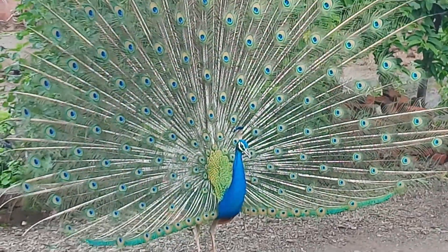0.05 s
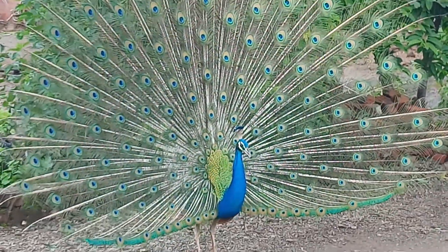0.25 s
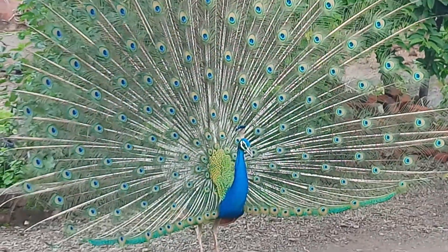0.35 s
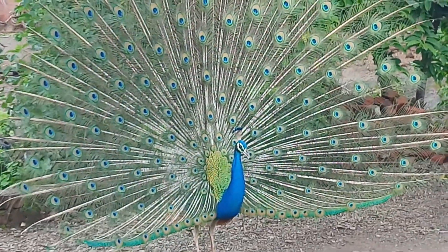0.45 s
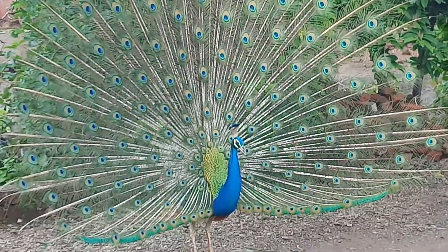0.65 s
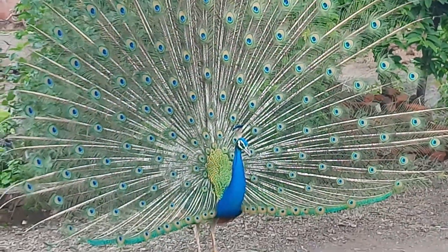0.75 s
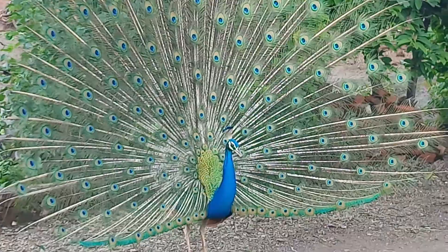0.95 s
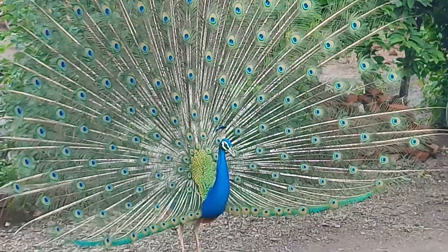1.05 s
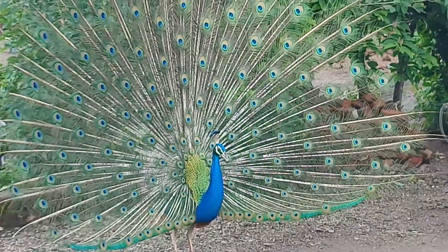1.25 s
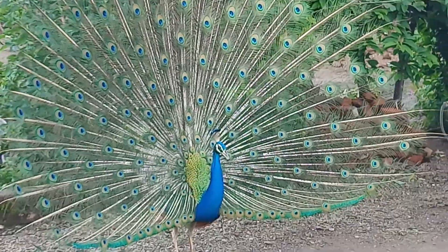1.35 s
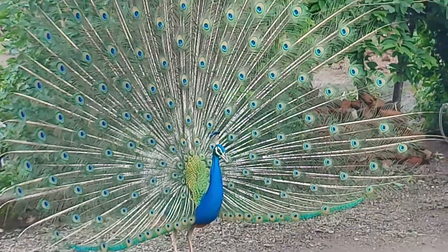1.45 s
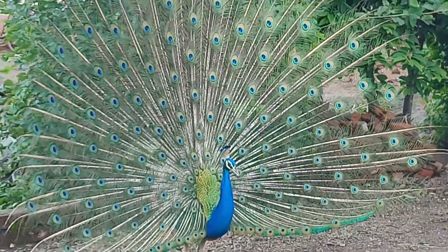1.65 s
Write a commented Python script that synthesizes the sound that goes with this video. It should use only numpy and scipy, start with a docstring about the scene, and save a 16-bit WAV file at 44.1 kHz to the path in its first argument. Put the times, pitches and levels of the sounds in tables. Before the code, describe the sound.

Small birds chatter and chirp outdoors over a faint low rumble and hiss.

```python
"""Small birds chatter in a garden: harsh syllables, a warble and two clear falling chirps.
Syllables are harmonics on a pitch arch, shaped by the throat and roughened by random modulation.
Warble notes and chirps are near-pure gliding tones with a little hiss. Walls and trees scatter the calls.
Behind them: thin far notes, faint feather rustles, soft bumps, foliage hiss and a low outdoor rumble."""
import sys
import numpy as np
from scipy import signal
from scipy.fft import rfft, irfft
from scipy.io import wavfile
from scipy.ndimage import uniform_filter1d

SR = 44100
rng = np.random.default_rng(int(sys.argv[2]) if len(sys.argv) > 2 else 0)


def persist_wave(psi):
    """Save psi, clipped to +-1, as 16-bit WAV."""
    counts = np.round(np.clip(psi, -1, 1) * 32767).astype(np.int16)
    wavfile.write(sys.argv[1], SR, np.atleast_2d(counts).T)


N = 74970

# background spectra: f/Hz, relative level/dB
RUMBLE_SPECTRUM = [(15, -42.5), (25, -16), (96, 4.5), (158, -0.5), (300, -14), (813, -20), (1200, -43)]
AIR_SPECTRUM = [(1000, -12.5), (1600, -5), (2400, 0.5), (3500, -2), (5000, -1.5), (6500, -10.5),
                (8500, -19.5), (9300, -18), (15500, -14)]
# soft bumps: t/s, f/Hz, level/dB, decay/s
SOFT_BUMPS = [(0.149, 231, -58, 0.012), (0.707, 180, -49, 0.011), (0.752, 169.7, -42, 0.0084)]
# rustles: t/s, half length/s, centre f/Hz, width/Hz, level/dB
RUSTLE_SWELLS = [(0.066, 0.038, 1750, 330, -57), (0.487, 0.089, 2530, 950, -51),
                 (0.783, 0.013, 3900, 1570, -54), (1.099, 0.043, 4260, 900, -50.5),
                 (1.201, 0.02, 3270, 1870, -43.5), (1.348, 0.043, 3070, 1580, -44.5)]
# distant birds: t/s, f/Hz, half length/s, level/dB
DISTANT_NOTES = [(0.132, 5950, 0.011, -58.5), (0.393, 970, 0.014, -63.5), (0.674, 584, 0.031, -67.5),
                 (0.78, 4660, 0.0043, -53)]
# overtone weighting of clear calls: f/Hz, gain/dB
OVERTONE_CURVE = [(4400, -52.5), (6100, -23), (7100, -21.5), (7700, -37), (8600, -19), (10500, -28.5),
                  (14000, -26)]
# single notes, then the warble run: t/s, f/Hz, half length/s, relative glide/(1/s), level/dB
CLEAR_NOTES = [(0.204, 2280, 0.003, -2.5, -43.5), (0.244, 2300, 0.0056, -8.5, -40),
               (0.265, 2280, .0055, -3, -37.5), (0.3295, 2290, 0.0026, -2.5, -33),
               (0.584, 2690, 0.0086, -6.5, -39), (0.672, 2666, .008, -8.5, -39),
               (0.87, 2320, 0.013, 0.5, -42), (0.885, 2680, 0.0089, -1.5, -43.5),
               (0.899, 2230, 0.0062, 2.5, -36), (0.901, 2380, 0.007, 12.5, -39.5),
               (.918, 3020, 0.0025, -7, -31.5), (0.923, 4200, 0.0061, -2.5, -45),
               (.931, 2900, 0.0026, -22.5, -33), (0.935, 2410, 0.0036, -4.5, -29),
               (.946, 2580, 0.0047, 6.5, -29), (0.954, 3050, 0.0024, 2, -32.5),
               (.961, 2450, 0.0047, -29, -31.5), (0.9672, 2750, 0.0026, 20, -33.5),
               (.976, 2860, 0.0076, -3.5, -35.5), (0.985, 2320, 0.0076, -4, -28),
               (1.079, 1950, 0.0049, 12, -49.5)]
# falling chirps: t/s, f/Hz, level/dB
NEAR_CHIRP_TRACK = [(1.09, 3100, -23.5), (1.09, 3602, -35), (1.1, 3525, -41), (1.103, 3754, -55),
                    (1.105, 5160, -39.5), (1.112, 4696, -38), (1.119, 3590, -30), (1.138, 3568, -30),
                    (1.141, 3033, -31), (1.146, 2643, -22.5), (1.15, 2520, -38.5), (1.159, 2337, -26.5),
                    (1.175, 2129, -42), (1.225, 2037, -50.5)]
FAR_CHIRP_TRACK = [(1.299, 3594, -52), (1.316, 3556, -45.5), (1.341, 3569, -43), (1.349, 3574, -44),
                   (1.358, 2950, -72), (1.362, 2554, -37), (1.386, 2160, -47.5)]
# syllables and longer squawks:
# apex t/s, apex f/Hz, rise/s, fall/s, level/dB, tilt/(dB/octave), roughness/(0-1)
HARSH_ARCHES = [(0.208, 2270, 0.02, 0.036, -45.5, -6, 0.5), (.267, 2383, 0.026, 0.029, -48, -5, 0.69),
                (.330, 2311, 0.005, 0.014, -45.5, -16.5, 0.63), (0.472, 2277, 0.0036, 0.02, -44, 7.5, 0.65),
                (.498, 2155, 0.015, 0.013, -41.5, 6, 0.46), (.564, 2107, 0.012, 0.021, -43, 1, 0.55),
                (.586, 2292, 0.0064, 0.024, -44, 4, 0.46), (0.663, 2430, 0.024, 0.035, -46.5, 0, 0.33),
                (.681, 2315, 0.008, 0.021, -42.5, 1.5, 0.38), (.835, 2682, 0.033, 0.076, -49.5, 3, 0.58),
                (.868, 2398, 0.021, 0.023, -45, -11, 0.62), (0.898, 2110, 0.011, 0.015, -41.5, -7, 0.57),
                (0.961, 1938, 0.006, 0.0032, -43, -14, 0.12), (1.428, 2122, 0.021, 0.016, -48.5, 1.5, 0.8),
                (1.448, 2252, 0.017, 0.029, -47.5, 1, 0.48), (1.481, 2244, 0.02, 0.017, -48, 10.5, 0.15),
                (1.542, 2078, 0.0079, 0.012, -49.5, 4, 0.67), (1.561, 2226, 0.013, 0.024, -47.5, 1, 0.53),
                (1.594, 2238, 0.016, 0.022, -49.5, 13, 0.44)]
SQUAWK_ARCHES = [(.207, 2301, 0.011, 0.04, -44, -0.5, 0.45), (.267, 2307, 0.016, 0.047, -42.5, -0.34, 0.54),
                 (.332, 2290, 0.028, 0.032, -46, -1, 0.5)]
# their throat responses: f/Hz, gain/dB
HARSH_RESPONSE = [(700, -71.5), (1100, -5.5), (1550, 4), (2000, -1), (2400, 20), (3100, 12), (4300, 4.5),
                  (5200, 1), (7000, -11), (8500, -56)]
SQUAWK_RESPONSE = [(800, -45.5), (1500, -1.5), (2300, 1.5), (3200, 4.5), (3800, -20.5), (6300, -9.5),
                   (8700, -27)]

RUMBLE_DB, AIR_DB = -62.5, -58.5
BUMP_ATTACK_S, FAR_GLIDE_PER_S = .004, -.3
LEAF_DECAY_S, WALL_DELAY_S, WALL_SPREAD_S, TAIL_T60_S = .009, .024, .0053, 1
SHIMMER_HZ, SHIMMER_WIDTH_HZ, SHIMMER_DB, SHIMMER_DECAY_S = 12850, 400, -41, .03
OVERTONE_STEP_DB, NOTE_JITTER, THROB_DB_PER_JITTER = -13, .011, 70
ARCH_DROP, ARCH_UP_S, ARCH_DOWN_S, EDGE_S = .52, .016, .018, .008
RASP_HZ, RASP_DEPTH, RASP_FADE_S, BREATH_GAIN = 554, .1474, .056, .843
SHELF_HZ, SHELF_DB, CUTOFF_HZ = 8980, -11, 15700


def undb(db):
    """Decibels to gain."""
    return 10 ** (np.asarray(db) / 20)


def unit(x):
    """Scale to rms 1."""
    return x / np.sqrt(np.mean(x ** 2) + 1e-20)


def gain_at(hz, curve):
    """Gain of an (f/Hz, level/dB) curve, interpolated in log f."""
    f, db = np.array(curve, float).T
    return undb(np.interp(np.log(hz + 1), np.log(f), db))


def noise(shape):
    """Unit-rms noise with amplitude spectrum shape(f)."""
    f = np.arange(N // 2 + 1) * SR / N
    return unit(irfft(rfft(rng.standard_normal(N)) * shape(f), N))


def flutter(hz):
    """Unit-rms random motion, low-passed at hz."""
    return noise(lambda f: 1 / (1 + (f / hz) ** 4))


def background():
    """Low rumble; wavering hiss of distant foliage and birds."""
    rumble = noise(lambda f: gain_at(f, RUMBLE_SPECTRUM) / (1 + (f / 1500) ** 4))
    air = noise(lambda f: gain_at(f, AIR_SPECTRUM)) * undb(1.4 * flutter(2.3))
    return undb(RUMBLE_DB) * rumble + undb(AIR_DB) * air


def bumps(t):
    """Dull knocks: a sine plus low noise, quickly damped."""
    out = np.zeros(N)
    for at_s, hz, db, decay_s in SOFT_BUMPS:
        dt = np.maximum(t - at_s, 0)
        env = 2 * (1 - np.exp(-dt / BUMP_ATTACK_S)) * np.exp(-dt / decay_s)
        out += undb(db) * env * (np.sin(2 * np.pi * hz * dt) + .4 * flutter(220))
    return out


def rustles(t):
    """Feathers and leaves: short, grainy swells of band noise."""
    out = np.zeros(N)
    for at_s, half_s, hz, width_hz, db in RUSTLE_SWELLS:
        band = noise(lambda f: np.exp(-(np.log((f + 1) / hz) * hz / width_hz) ** 2))
        out += undb(db) * np.exp(-((t - at_s) / half_s) ** 2) * band
    grain_db = 1.8 * flutter(100)
    return out * undb(grain_db)


def far_notes(t):
    """Distant birds: faint, slightly sinking sines."""
    out, shake = np.zeros(N), flutter(140)
    for at_s, hz, half_s, db in DISTANT_NOTES:
        pitch_hz = hz * (1 + FAR_GLIDE_PER_S * (t - at_s) + .0094 * shake)
        env = np.exp(-((t - at_s) / half_s) ** 2)
        out += undb(db) * env * np.sqrt(2) * np.sin(2 * np.pi * np.cumsum(pitch_hz) / SR)
    return out


def garden(calls, t, echo_db):
    """Direct sound plus leaf scatter, a smeared wall echo and a thin tail."""
    leaves = np.exp(-t / LEAF_DECAY_S)
    wall = np.exp(-((t - WALL_DELAY_S) / WALL_SPREAD_S) ** 2)
    tail = np.exp(-np.log(1000) * t / TAIL_T60_S)
    paths = [(leaves, -11.5), (wall, -15.5 + echo_db), (tail, -12 + echo_db / 2)]
    response = sum(undb(db) * unit(env * rng.standard_normal(N)) / np.sqrt(N) for env, db in paths)
    return calls + signal.fftconvolve(calls, response)[:N]


def shimmer(calls):
    """Narrow high hiss that swells with the calls and fades after them."""
    pole = np.exp(-1 / (SHIMMER_DECAY_S * SR))
    power = signal.lfilter([1 - pole], [1, -pole], calls ** 2)
    band = noise(lambda f: np.exp(-((f - SHIMMER_HZ) / SHIMMER_WIDTH_HZ) ** 2))
    return undb(SHIMMER_DB) * np.sqrt(power) * band


def beak_hiss():
    """High hiss of a clear call."""
    return undb(-24) * noise(lambda f: 1 / (1 + ((f - 6400) / 2200) ** 4))


def clear_tone(pitch_hz, overtone_db):
    """Gliding sine with three weak overtones."""
    phase = 2 * np.pi * np.cumsum(pitch_hz) / SR
    tone = np.sin(phase)
    for k in range(2, 5):
        gain = gain_at(k * pitch_hz, OVERTONE_CURVE) * undb(overtone_db + OVERTONE_STEP_DB * (k - 2.5))
        tone += gain * np.sin(k * phase)
    return np.sqrt(2) * tone


def clear_notes(t):
    """Brief gliding notes; a quick run of them makes the warble."""
    out, shake, hiss = np.zeros(N), flutter(RASP_HZ), beak_hiss()
    for at_s, hz, half_s, glide_per_s, db in CLEAR_NOTES:
        span = abs(t - at_s) < .02
        dt = t[span] - at_s
        pitch_hz = hz * np.exp(glide_per_s * dt) * (1 + NOTE_JITTER * shake[span])
        env = np.exp(-abs(dt / half_s) ** 3)
        out[span] += undb(db) * env * (clear_tone(pitch_hz, overtone_db=0) + hiss[span])
    return out


def chirp(t, track, jitter, overtone_db):
    """Near-pure whistle with a little hiss; jitter shakes pitch and level."""
    at_s, hz, db = np.array(track).T
    pitch_hz = np.interp(t, at_s, hz) * (1 + jitter * flutter(RASP_HZ))
    gate = (t > at_s[0]) * (t < at_s[-1])
    env = uniform_filter1d(undb(np.interp(t, at_s, db)) * gate, size=80)
    env *= undb(THROB_DB_PER_JITTER * jitter * flutter(182))
    return env * (clear_tone(pitch_hz, overtone_db) + beak_hiss())


def syllables(t, arches, throat):
    """Six throat-filtered harmonics on a pitch arch; rasp and breath fade after the apex."""
    out = np.zeros(N)
    shake, throb = flutter(RASP_HZ), flutter(RASP_HZ / 2)
    for at_s, hz, rise_s, fall_s, db, tilt_db_oct, roughness in arches:
        span = abs(t - at_s) < .1
        dt = t[span] - at_s
        bend = (dt / np.where(dt < 0, ARCH_UP_S, ARCH_DOWN_S)) ** 2
        pitch_hz = hz * (1 - ARCH_DROP * bend / (1 + bend))
        rasp = roughness * np.exp(-np.maximum(dt, 0) / RASP_FADE_S)
        phase = 2 * np.pi * np.cumsum(pitch_hz * (1 + RASP_DEPTH * rasp * shake[span])) / SR
        gate = (1 + np.tanh(2 * (dt + rise_s) / EDGE_S)) * (1 + np.tanh(2 * (fall_s - dt) / EDGE_S))
        swell = np.exp(-.8 * (dt / np.where(dt < 0, rise_s, fall_s)) ** 2)

        def colour(f):
            return gain_at(f, throat) * undb(tilt_db_oct * np.log2((f + 1) / hz)) * (f > throat[0][0])

        tone = unit(sum(colour(k * pitch_hz) * np.sin(k * phase) for k in range(1, 7)))
        breath = BREATH_GAIN * rasp * noise(colour)[span]
        voice = gate * swell * (tone * (1 + rasp * throb[span]) + breath)
        rms = np.sqrt(np.sum(voice ** 2) / SR / (rise_s + fall_s))
        out[span] += undb(db) * voice / rms
    return out


def scene():
    """Chatter and chirps, each with its own garden echo, over the background; mono."""
    t = np.arange(N) / SR
    notes = clear_notes(t)
    squawks = syllables(t, SQUAWK_ARCHES, SQUAWK_RESPONSE)
    chatter = squawks + syllables(t, HARSH_ARCHES, HARSH_RESPONSE) + notes
    chirps = chirp(t, NEAR_CHIRP_TRACK, jitter=.014, overtone_db=2)
    chirps += chirp(t, FAR_CHIRP_TRACK, jitter=.01854, overtone_db=4.5)
    birds = garden(chatter, t, echo_db=-5) + garden(chirps, t, echo_db=1.5) + shimmer(notes + chirps)
    return (birds + far_notes(t) + rustles(t) + bumps(t) + background())[None]


def record(dry):
    """Treble shelf cut, then a steep low-pass."""
    f = np.arange(N // 2 + 1) * SR / N
    shelf = undb(SHELF_DB * (1 + np.tanh((f - SHELF_HZ) / 200)) / 2)
    lowpass = signal.ellip(10, .2, 70, CUTOFF_HZ, fs=SR, output="sos")
    return signal.sosfilt(lowpass, irfft(rfft(dry) * shelf, N))


dry = scene()
out = record(dry)
persist_wave(out)
```